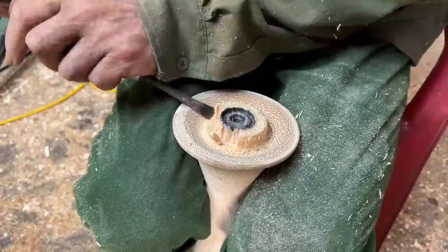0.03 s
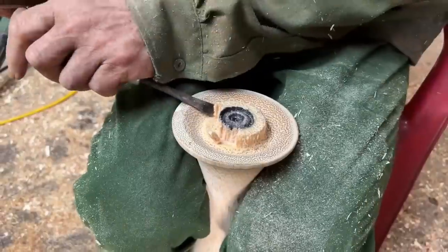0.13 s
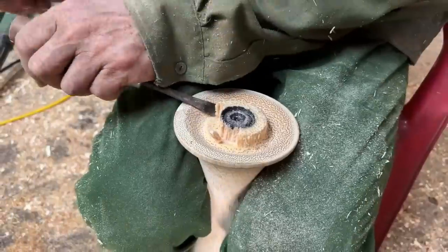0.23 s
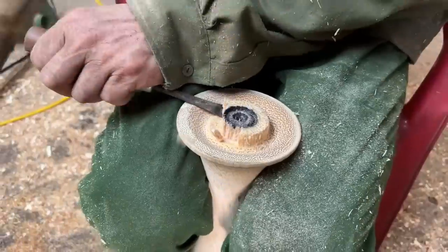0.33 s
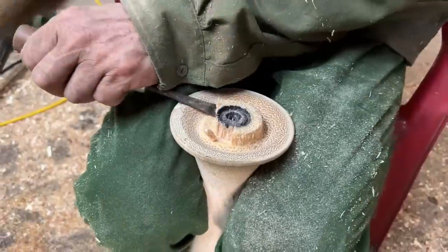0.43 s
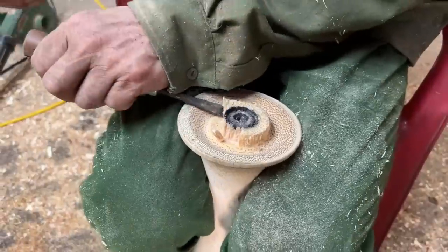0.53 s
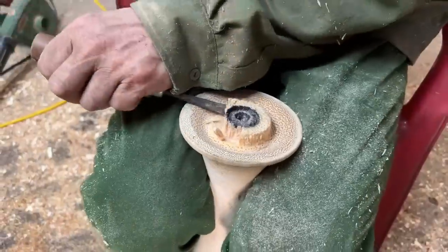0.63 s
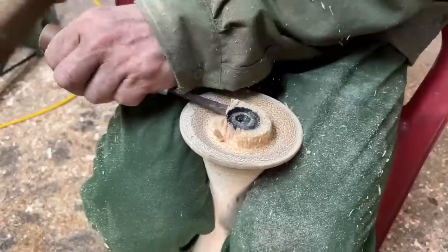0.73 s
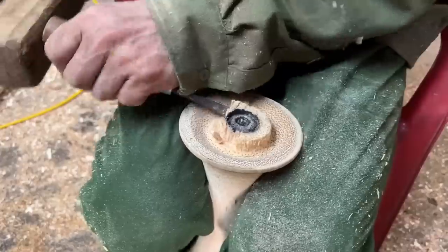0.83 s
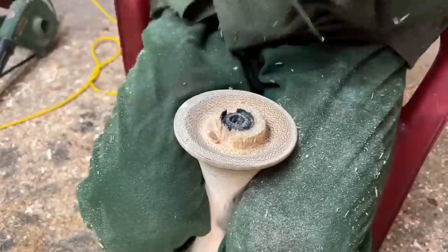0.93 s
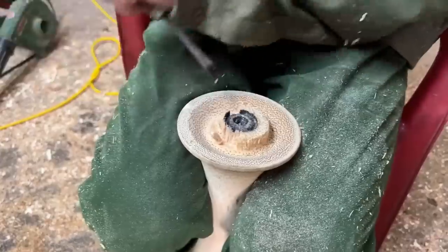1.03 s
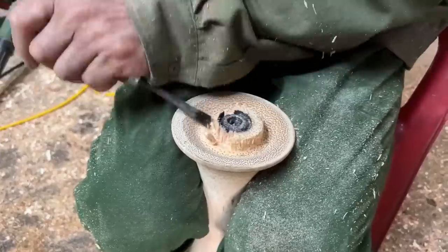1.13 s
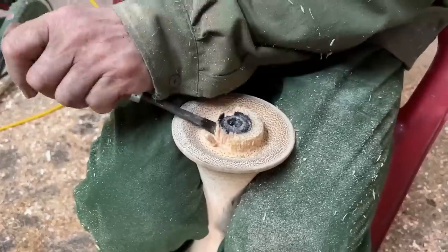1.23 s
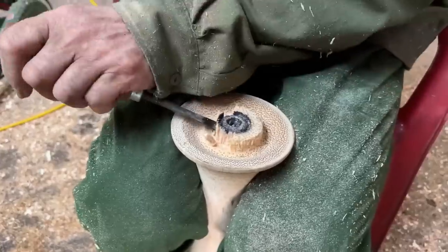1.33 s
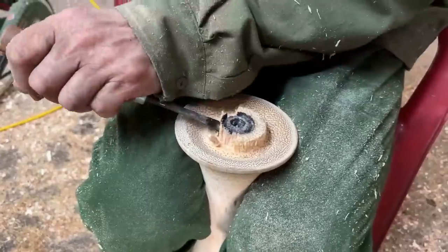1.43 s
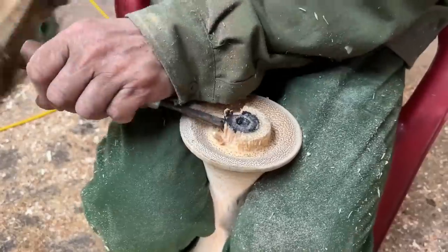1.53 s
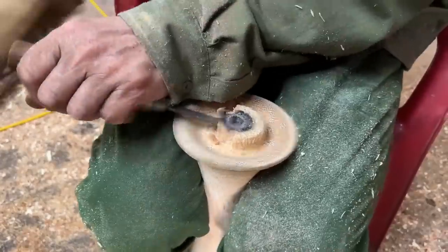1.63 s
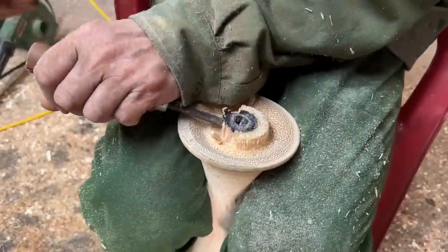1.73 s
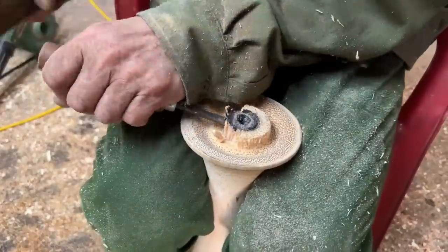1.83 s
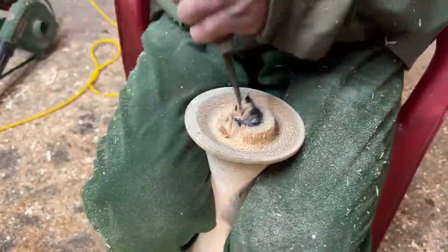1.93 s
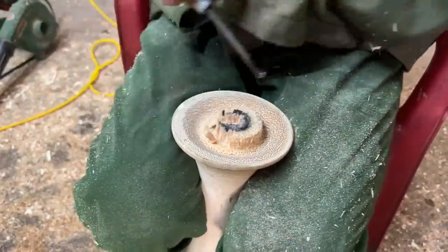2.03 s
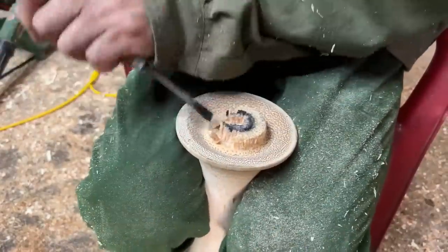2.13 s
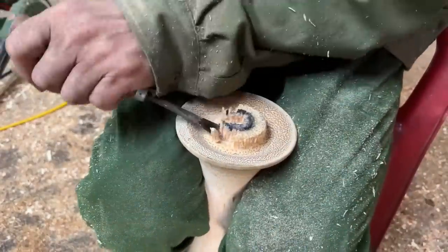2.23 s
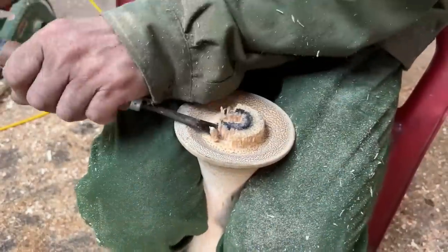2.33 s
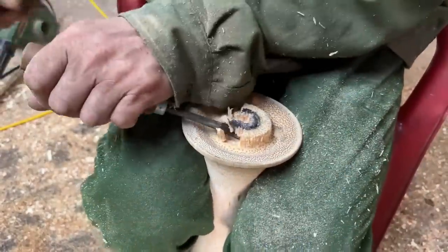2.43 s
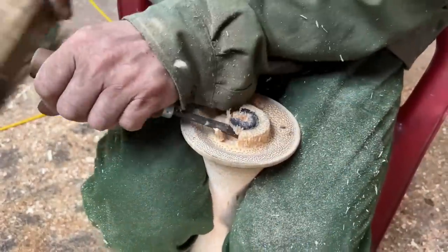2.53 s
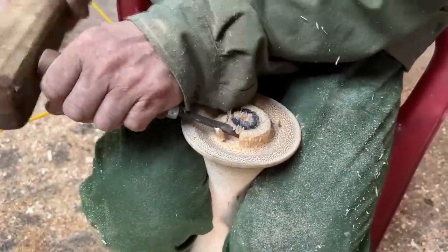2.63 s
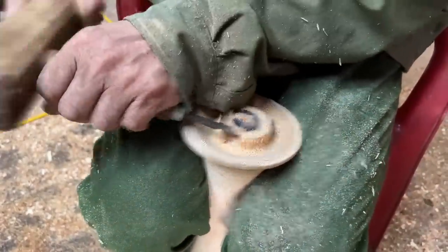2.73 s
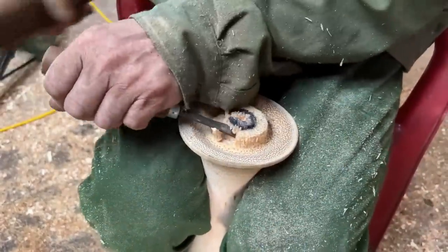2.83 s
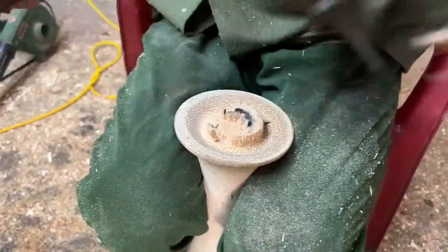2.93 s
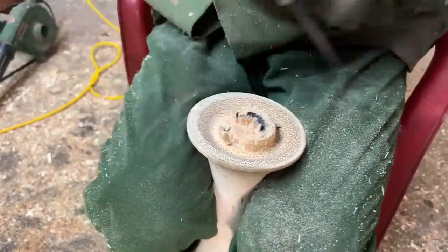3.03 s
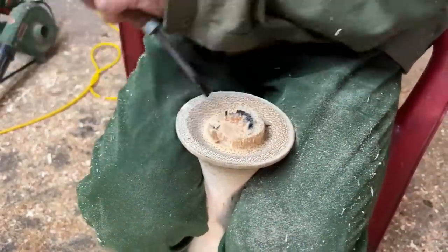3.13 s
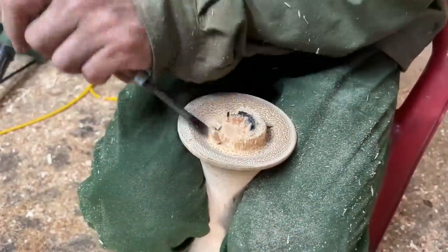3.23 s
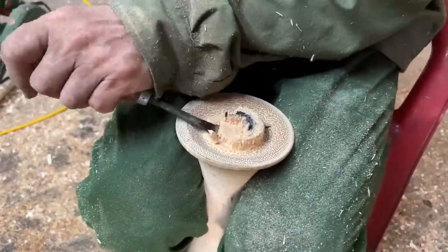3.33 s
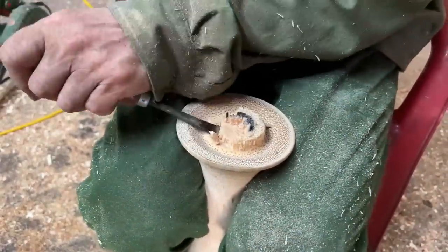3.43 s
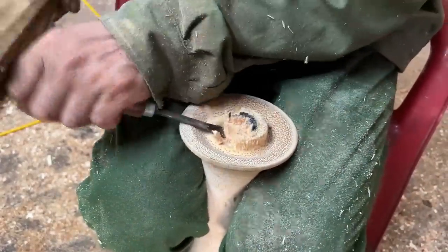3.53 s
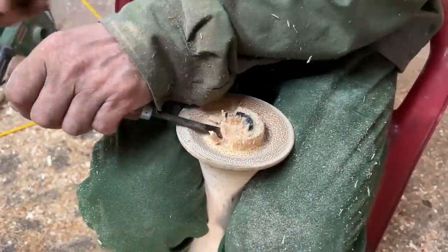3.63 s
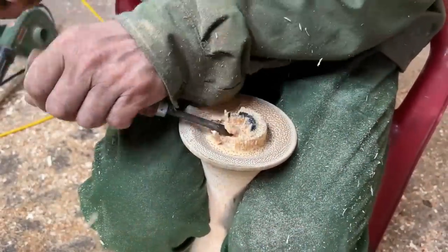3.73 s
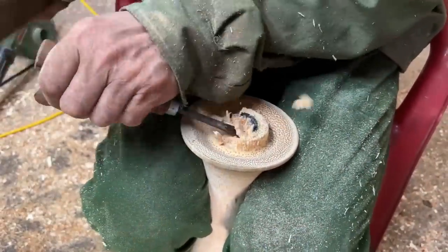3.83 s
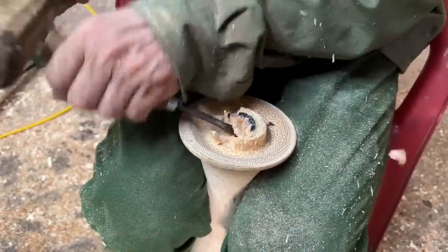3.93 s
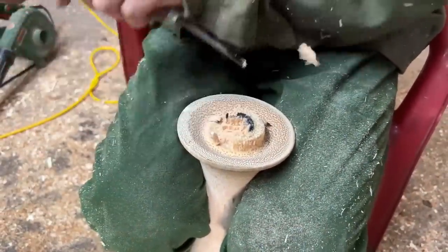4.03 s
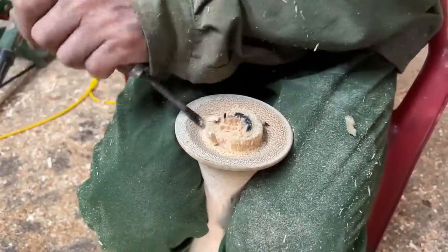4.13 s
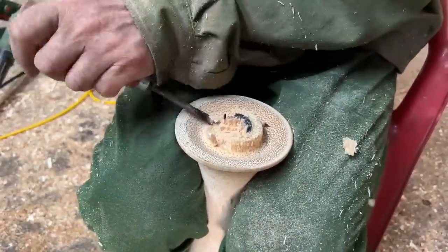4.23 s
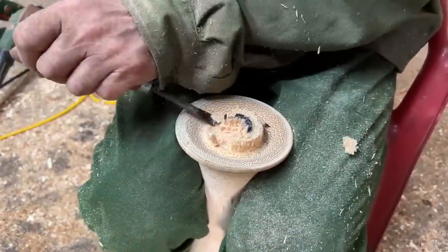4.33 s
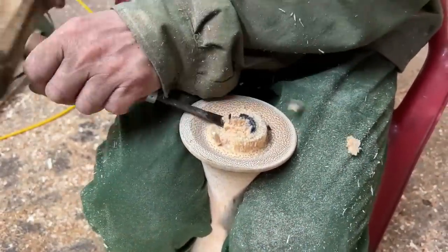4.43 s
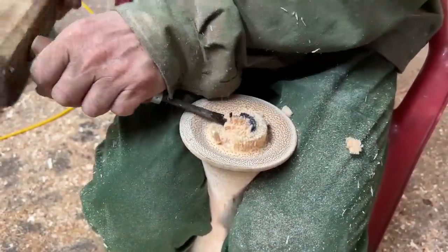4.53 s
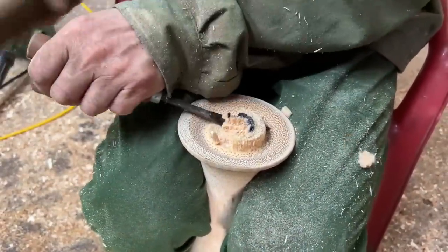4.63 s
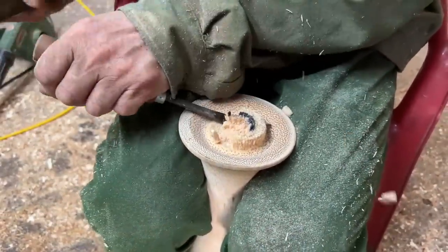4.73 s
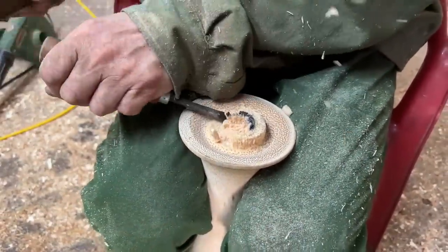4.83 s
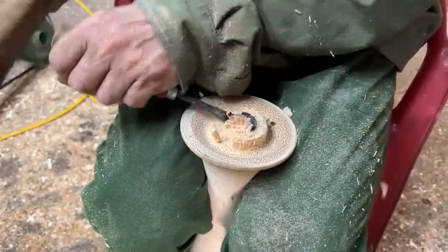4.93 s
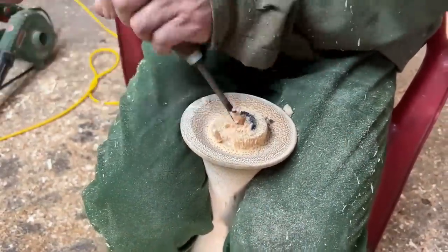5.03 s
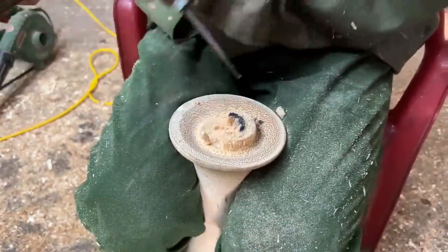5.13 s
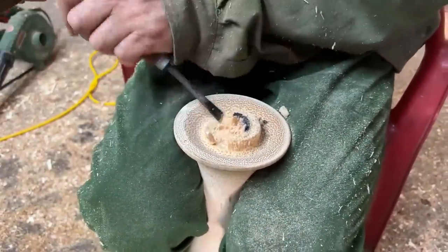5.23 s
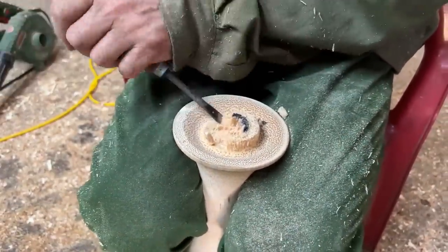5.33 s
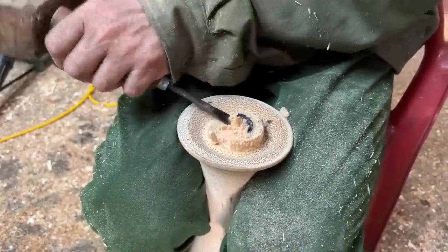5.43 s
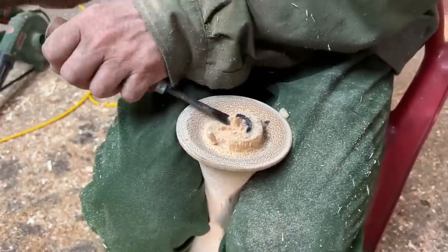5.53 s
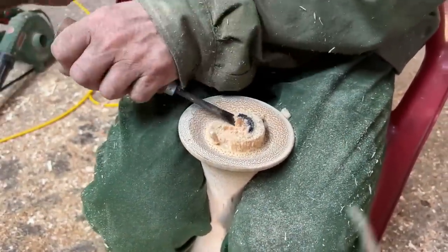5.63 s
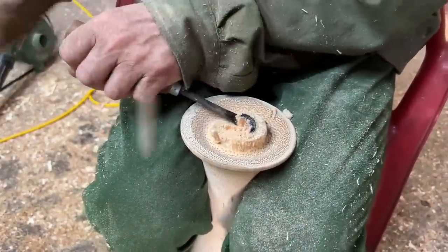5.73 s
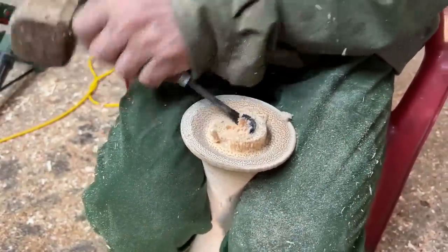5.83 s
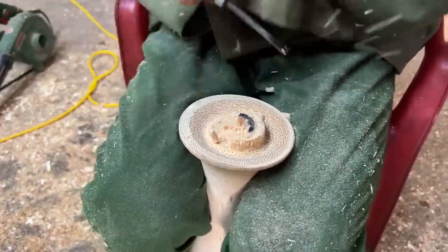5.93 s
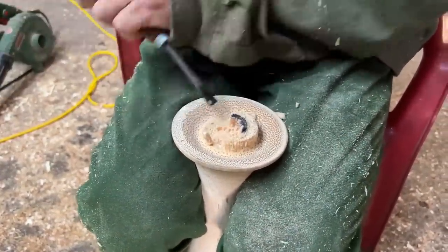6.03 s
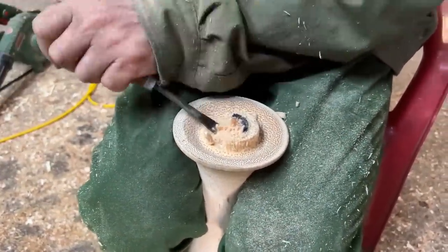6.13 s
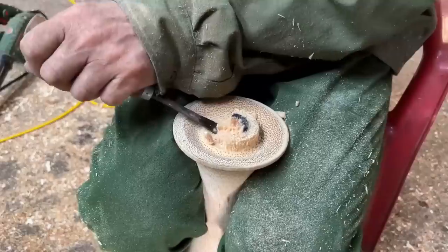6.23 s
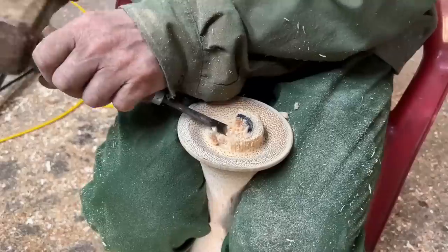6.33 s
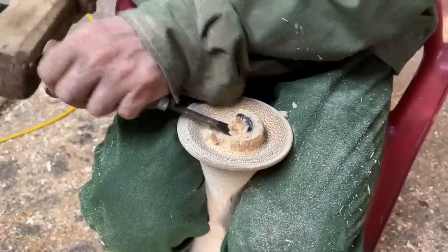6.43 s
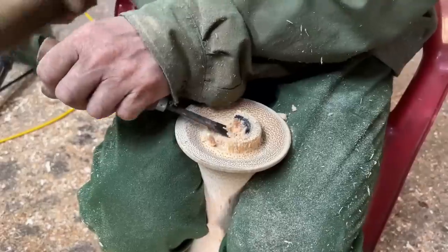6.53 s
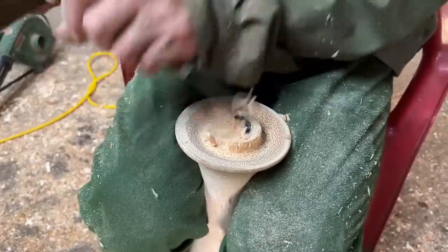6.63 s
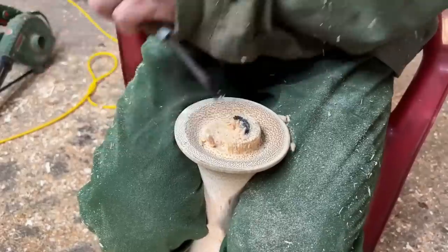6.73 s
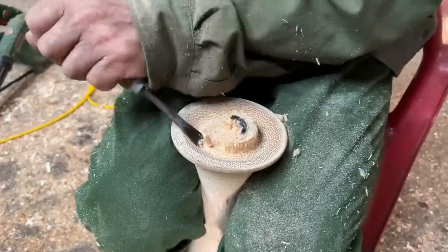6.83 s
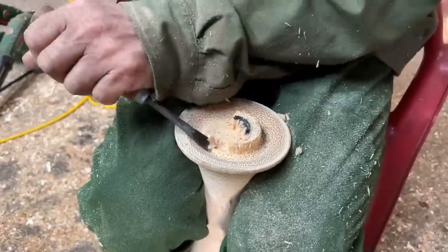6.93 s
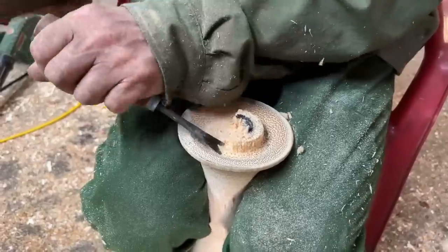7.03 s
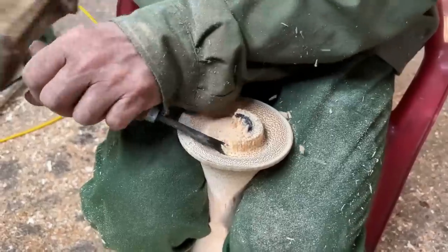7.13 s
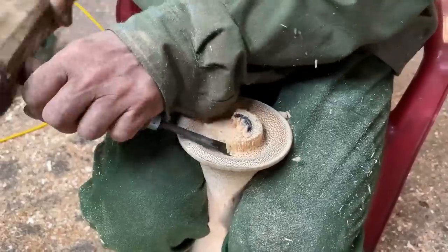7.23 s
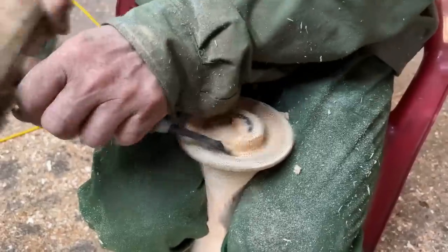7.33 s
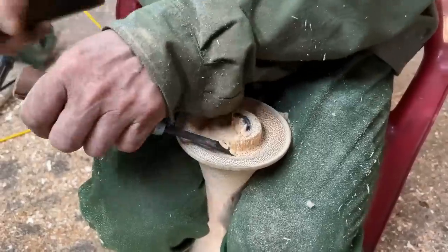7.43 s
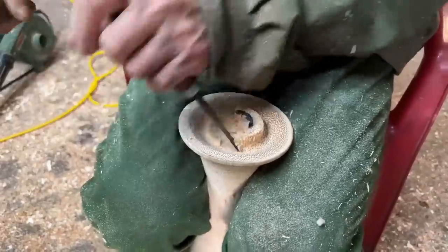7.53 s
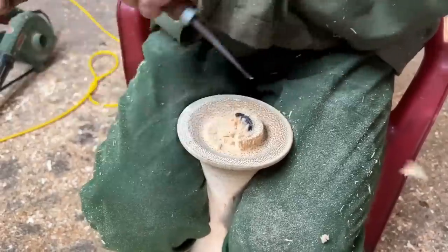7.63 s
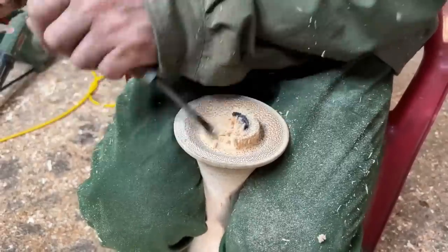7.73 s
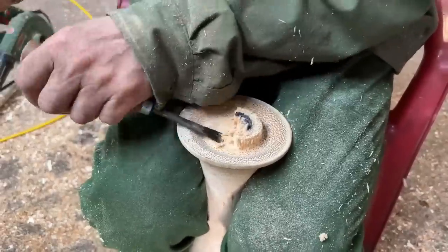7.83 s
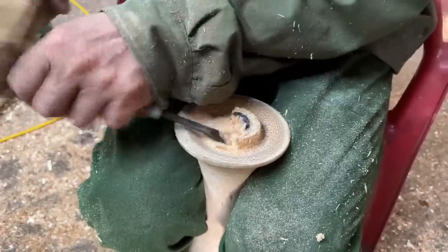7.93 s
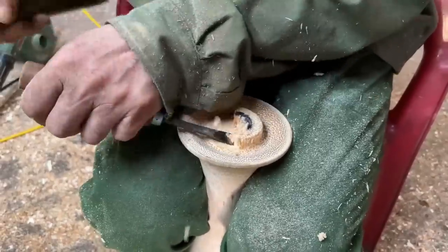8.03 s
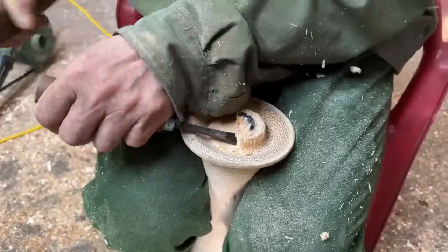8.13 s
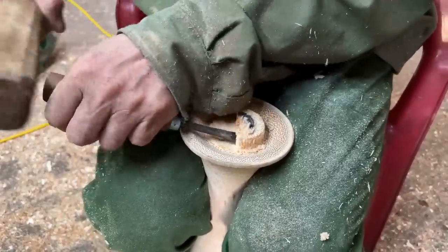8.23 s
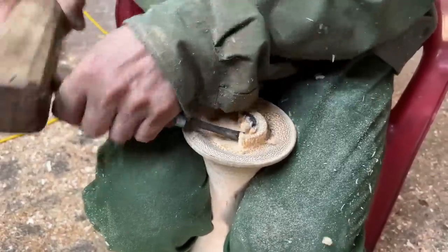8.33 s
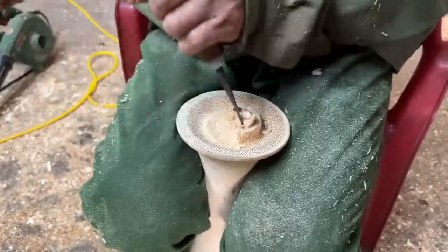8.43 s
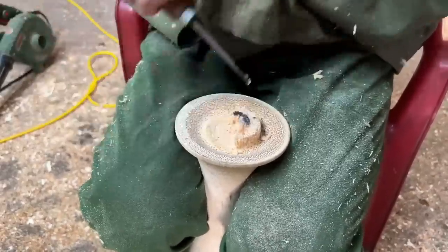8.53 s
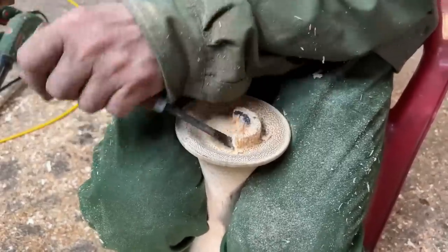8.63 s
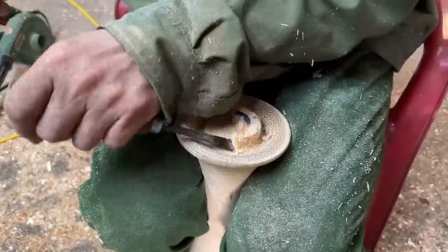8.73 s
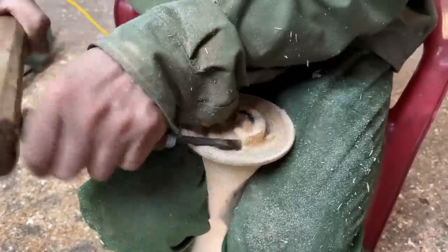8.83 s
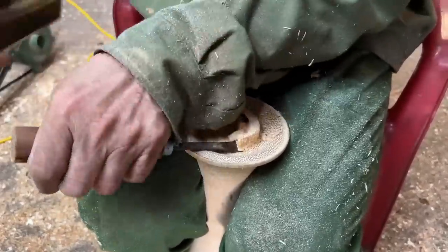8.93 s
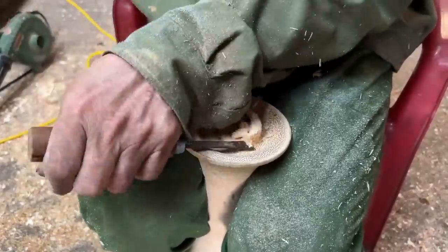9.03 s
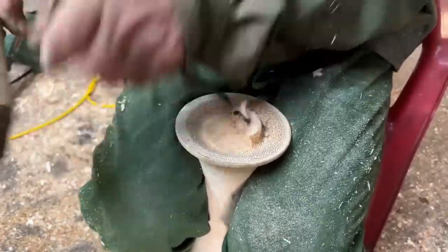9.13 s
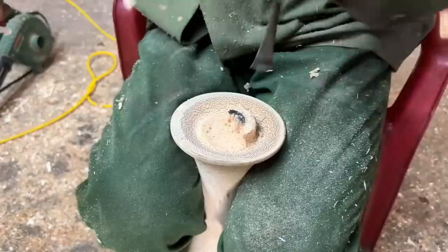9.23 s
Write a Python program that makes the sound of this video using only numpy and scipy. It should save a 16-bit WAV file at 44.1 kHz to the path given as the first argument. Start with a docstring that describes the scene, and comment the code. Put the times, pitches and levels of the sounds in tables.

```python
"""A wooden mallet drives a chisel into the foot of a turned vase held on the lap, in runs of three to five blows.
A blow is filtered noise of snapping fibres, damped modes of chisel and vase, and a thud into the legs.
Between runs, short resonant crackles are chips and blade touches; muffled bursts are the vase shifting on cloth.
A small workshop answers with decaying noise; shaped noise hums below, with a wavering drone at the start."""
import sys
import numpy as np
from scipy import signal
from scipy.fft import rfft, irfft
from scipy.io import wavfile
from scipy.ndimage import uniform_filter1d

SR = 44100
rng = np.random.default_rng(int(sys.argv[2]) if len(sys.argv) > 2 else 0)


def dump_mix(stems):
    """Bounce the given channels to the path in sys.argv[1] as a 16-bit WAV at rate SR."""
    frames = np.atleast_2d(stems).T  # one column per channel
    limited = np.clip(frames, -1, 1)  # hard clip at full scale
    pcm = np.round(limited * 32767).astype(np.int16)
    wavfile.write(sys.argv[1], SR, pcm)


N = 409248  # samples

# steady background spectrum, relative: freq_hz, density_db_per_hz
HUM_SPECTRUM = [(25, -5), (55, -6), (100, -.7), (170, -5.5), (220, -4), (290, 1.5), (380, -15), (550, -19),
                (1100, -17.5), (2800, -26), (4500, -33), (8000, -40), (11000, -51), (16000, -58)]
# swell of the background: time_s, gain_db
HUM_SWELL = [(.35, 7), (1.2, 1), (2.3, 2), (3.3, -1.5), (5.3, -.5), (7.4, 2), (9.28, .7)]
# light touches of the blade on the vase: start_s, level_db
TOUCHES = [(.132, -43), (6.917, -49)]
# chips flicked loose, mostly as the blade pulls out after a run:
# start_s, level_db, pitch_hz, decay_s, left_re_right_db
CHIPS = [(.198, -63, 3800, .003, 1), (1.005, -57, 3000, .007, 0), (2.049, -45, 2800, .008, 3),
         (2.276, -63, 4000, .005, 3), (3.025, -52, 3000, .007, 1), (4.065, -57, 3000, .006, -2),
         (5.131, -52, 5000, .014, 6), (5.146, -52, 4500, .005, 5), (5.164, -55, 3500, .005, 1),
         (6.017, -50, 3000, .009, 2), (6.745, -49, 3000, .008, -1), (7.702, -44, 2800, .004, -6),
         (7.938, -68, 4500, .004, 0), (8.527, -52, 2700, .005, 0), (8.562, -49, 2600, .005, -1)]
# dull bumps of the vase and arm on the lap: start_s, level_db, upper_edge_hz, decay_s
BUMPS = [(.355, -25, 1300, .009), (2.052, -42, 480, .02), (3.595, -37.5, 120, .02), (5.20, -43.5, 130, .03),
         (6.035, -48, 120, .015), (8.565, -46, 380, .02)]
# mallet blows, levels before trims:
# start_s, crack_db, thud_db, give_s (time the wood gives), ring_re_crack_db, left_re_right_db
BLOWS = [(.4003, -21, -36, .013, -4, -6), (.5482, -19, -43, .0044, -8, -3),
         (.6766, -21, -35, .0071, -7, -4), (.8017, -19, -35, .0041, -6, 3),
         (.9208, -23, -35, .003, -10, -2), (1.6127, -23, -38, .0015, -4, 0),
         (1.7454, -18, -39, .0029, -14, 1), (1.8741, -20, -42, .0034, -10, -2),
         (2.4781, -22, -52, .0014, -11, 5), (2.6097, -21, -40, .0062, -8, -2),
         (2.7321, -22, -40, .0017, -10, 1), (2.8468, -24, -39, .0048, -14, -2),
         (2.9579, -25, -37, .0059, -11, 1), (3.6431, -17, -44, .0028, -9, 1),
         (3.7673, -22, -48, .0056, -9, -5), (3.8921, -23, -44, .0081, -7, 3),
         (4.0098, -19.5, -49, .0027, -4.5, 1), (4.5104, -23, -41, .0022, -11, -2),
         (4.6325, -19.5, -40, .0066, -13, -8), (4.7557, -23, -39, .0052, -12, -6),
         (4.8695, -18, -41, .004, -14, -9), (4.9892, -24, -41, .0029, -13, 5),
         (5.5367, -23, -41, .0053, -10, 0), (5.6655, -17, -43, .0028, -11, -1),
         (5.7925, -20, -36, .0023, -11, 7), (5.9103, -22, -35, .0063, -8, -3),
         (6.4128, -18, -46, .0037, -7, 2), (6.537, -20, -45, .0065, -2, 4),
         (6.6572, -19, -42, .0094, -7, -6), (7.0869, -18, -48, .0038, -5, 1),
         (7.2159, -21, -46, .0075, -2, -3), (7.3349, -23, -48, .0018, -7, 3),
         (7.4504, -19, -38, .0077, -9, -1), (7.5701, -20, -34, .0042, -14, 5),
         (8.0503, -17, -47, .0067, -6, 0), (8.1811, -21, -44, .0018, -5, 2),
         (8.3127, -22, -44, .0104, -5.5, -6), (8.4295, -24, -39, .0017, -10, 3),
         (8.9402, -20, -45, .0054, -6, 4), (9.0652, -21, -39, .0061, -10, -2),
         (9.1851, -20, -37, .0037, -9, 6)]
# runs of blows, one cut each, the blade set in a new place in the grain; base values:
# start_s, knock_db, splinter_re_crack_db, splinter_tilt_db_per_octave, room_db
CUTS = [(.3, -30.7, -9.2, 2.8, -28.3), (1.5, -32.7, -11, -.3, -30), (2.4, -34, -12, 0, -30),
        (3.5, -33.3, -8.5, -1.8, -32.8), (4.4, -31.8, -10, .2, -31.8), (5.4, -31.5, -12, 3, -31.6),
        (6.3, -34.3, -12.2, -.7, -29.3), (6.95, -33.5, -11.8, .5, -31.6), (7.95, -33.3, -10, -3.5, -30.8),
        (8.8, -32.5, -8.6, -5, -31)]
# colour of the struck wood, relative: freq_hz, density_db_per_hz
WOOD_COLOUR = [(40, -16), (260, -12.5), (450, -16.5), (620, -12.5), (800, -8), (960, -11.5), (1300, -5.5),
               (1800, -1), (3250, -6.7), (3800, -4), (4600, -15.5), (6300, -13.5), (12000, -26),
               (16000, -24)]
# modes of chisel and vase: ratio_to_ring_pitch, level_db, t60_s
TOOL_MODES = [(.455, -17, .07), (.76, -10, .07), (.962, -4, .08), (1.0, 0, .115), (1.04, -4.5, .08),
              (1.17, -10, .06), (1.55, -15, .04), (2.09, -15, .06), (2.22, -14, .06)]
# workshop decay: freq_hz, t60_s
ROOM_T60 = [(100, .3), (400, .36), (1000, .33), (1800, .31), (3800, .27), (7000, .27), (15000, .21)]
# workshop colour: freq_hz, gain_db
ROOM_COLOUR = [(60, -9), (250, -4), (500, 1.5), (1200, 2.5), (1800, 1.2), (2600, -1), (3700, -1.5),
               (4500, -3), (6000, -1.3), (10000, -3), (15000, -5.5)]

# registers of a blow: lower_edge_hz, upper_edge_hz, decay_factor, offset_s, trim_db
THUD = (35, 355, 1.1, .001, 0)
KNOCK = (400, 1450, 1.35, -.0008, .7)
CRACK = (1450, 4500, .62, -.0005, -.6)
SPLINTER = (4200, 16000, .8, -.0002, .5)

HUM_DB = -57.6  # before the swell
# drone holds, then dies away
DRONE_HZ, DRONE_DB, DRONE_HOLD_S, DRONE_FALL_DB_PER_S = 62, -47.5, .17, 90
FIZZ_RE_CHIP_DB = -3

# ordinary blow
USUAL_CRACK_DB, USUAL_THUD_DB, USUAL_GIVE_S = -20.5, -40.7, .004
# the knock of the vase follows crack and thud (dB per dB) and grows as the edge sinks in
KNOCK_DB_PER_CRACK_DB, KNOCK_DB_PER_THUD_DB, KNOCK_DB_PER_BLOW = .68, .42, .5
# ring pitch shifts as the grip changes
RING_HZ, RING_SCATTER_HZ = 1770, 50
# a heavier thud tears finer splinters: dB per octave for each dB of thud; chance, dB per octave
TILT_PER_THUD_DB, TILT_SCATTER_DB_PER_OCTAVE = .15, .8
# resonance of the chip loosened by a blow
CHIP_HZ, CHIP_SCATTER_OCTAVES = 2900, .3
# the room answers more evenly than the crack (dB per dB), more to a long tear, less to a buried edge
ROOM_DB_PER_CRACK_DB, ROOM_DB_PER_GIVE_DOUBLING, ROOM_DB_PER_BLOW = .45, .6, -.35
# the two channels start slightly apart, usually the louder one first: s per dB, and chance in s
LAG_S_PER_DB, LAG_SCATTER_S = .00016, .0009

EDGE_HZ = 16150  # upper band limit

# frame of one short sound; T is zero at the snap
SIZE = 8192
LEAD_S = 512 / SR
T, HZ = np.arange(SIZE) / SR - LEAD_S, np.fft.rfftfreq(SIZE, 1 / SR)


def amp(db):
    """Decibels to gain."""
    return 10 ** (np.asarray(db) / 20)


def read(points, hz):
    """Interpolates a (freq_hz, value) table on a log-frequency axis."""
    table_hz, value = np.transpose(points)
    return np.interp(np.log(hz + 1), np.log(table_hz + 1), value)


def background(shared=.12, waver=.06, wander_db=.8):
    """Low hum and faint hiss as partly shared stereo noise, plus a wavering sine drone that dies away."""
    t = np.arange(N) / SR
    gain = amp(read(HUM_SPECTRUM, np.fft.rfftfreq(N, 1 / SR)))
    noise = irfft(rfft(rng.standard_normal((3, N))) * gain, N)
    noise /= noise.std()
    stereo = np.sqrt(shared) * noise[0] + np.sqrt(1 - shared) * noise[1:]
    hum = stereo * amp(HUM_DB + np.interp(t, *np.transpose(HUM_SWELL)))

    wander = uniform_filter1d(uniform_filter1d(rng.standard_normal(N), size=4000), size=2500)
    hum *= amp(wander_db * wander / wander.std())

    drift = uniform_filter1d(rng.standard_normal(N), size=2000)
    turns = np.cumsum(DRONE_HZ * (1 + waver * drift / drift.std())) / SR
    drone_db = DRONE_DB - DRONE_FALL_DB_PER_S * np.maximum(t - DRONE_HOLD_S, 0)
    drone = amp(drone_db) * np.sqrt(2) * np.sin(2 * np.pi * turns)
    return hum + drone


def add(mix, start_s, sound):
    """Mixes a stereo sound in at start_s, cut at the end of the mix."""
    part = mix[:, max(round(start_s * SR), 0):][:, :sound.shape[1]]
    part += sound[:, :part.shape[1]]


def sized(x, level_db):
    """Scales each channel to the energy of 10 ms of sound at level_db."""
    energy = np.sum(x ** 2, -1, keepdims=True)
    return x * amp(level_db) * np.sqrt(SR / 100 / (energy + 1e-20))


def band(hz, low_hz, high_hz):
    """Gain of a steep band-pass."""
    return 1 / np.sqrt((1 + (low_hz / (hz + 1)) ** 12) * (1 + (hz / high_hz) ** 12))


def coloured(x, gain):
    """Minimum-phase filter with the given gain per frequency bin, floored 80 dB below its peak."""
    log_gain = np.log(np.maximum(gain, gain.max() * 1e-4))
    circle = np.concatenate([log_gain, log_gain[-2:0:-1]])
    response = np.exp(np.conj(signal.hilbert(circle)))[:len(gain)]
    return irfft(rfft(x) * response)


def placed(x, left_re_right_db, lag_s=0):
    """Tips a stereo sound to one side; positive lag_s delays the right channel, negative the left."""
    gains = amp([left_re_right_db / 2, -left_re_right_db / 2])
    gains /= np.sqrt(np.mean(gains ** 2))
    delays_s = np.maximum([-lag_s, lag_s], 0)
    late = np.array([np.pad(c, (round(d * SR), 0))[:len(c)] for c, d in zip(x, delays_s)])
    return late * gains[:, None]


def fibres(decay_s, press_db=-12.5, press_s=.0042, snap=2.6, grain_db=4.0, shared=.4,
           after_db=-17, after_s=.012):
    """Fibres crush as the edge presses in, one snaps, the rest break in a dying burst, a few tear late."""
    noise = rng.standard_normal((3, SIZE))
    noise = noise * amp(grain_db * np.clip(rng.standard_normal((3, SIZE)), -2, 2))
    noise /= noise.std()
    burst = np.sqrt(shared) * noise[0] + np.sqrt(1 - shared) * noise[1:]
    pressing = amp(press_db) * np.exp(-abs(T) / press_s)
    breaking = np.exp(-abs(T) / decay_s) + amp(after_db) * np.exp(-abs(T) / after_s)
    impulse = snap * (np.arange(SIZE) == round(LEAD_S * SR))
    return burst * np.where(T < 0, pressing, breaking) + impulse


def workshop(x, build_s=.012, patchy_db=3.0):
    """Dense reflections from walls and benches, in clumps, each band dying at its own speed."""
    taps = rng.standard_normal((2, SR // 2))
    hz, t, spectrum = signal.stft(taps, SR, nperseg=256)

    fade = amp(-60 * t / read(ROOM_T60, hz)[:, None]) * (1 - np.exp(-(t / build_s) ** 2))
    fade /= np.sqrt(np.sum(fade ** 2, 1).max() * t[1] * SR)  # unit energy in the longest band

    patches = uniform_filter1d(rng.standard_normal(spectrum.shape), size=8, axis=1)
    patches = uniform_filter1d(patches, size=3, axis=2)
    clumps = amp(patchy_db * patches / patches.std())
    clumps /= np.sqrt(np.mean(clumps ** 2))

    colour = amp(read(ROOM_COLOUR, hz))[:, None]
    tail = signal.istft(spectrum * fade * clumps * colour, SR, nperseg=256)[1]
    return signal.fftconvolve(x, tail, axes=1)


def crackle(pitch_hz, level_db, decay_s, sharpness=2.6):
    """Small dry crackle: a fibre burst through one broad resonance."""
    detuning = sharpness * (HZ / pitch_hz - pitch_hz / (HZ + 1))
    resonance = band(HZ, 500, 1.5 * pitch_hz) / (1 + detuning ** 2)
    return sized(coloured(fibres(decay_s), resonance), level_db)


def touches(pitch_hz=1850, decay_s=.002, left_re_right_db=-3, room_db=-12):
    """The blade is set against the vase with a dull, broadly resonant tick."""
    out = np.zeros((2, N))
    for start_s, level_db in TOUCHES:
        tick = crackle(pitch_hz, level_db, decay_s, sharpness=1.6)
        add(out, start_s - LEAD_S, placed(tick, left_re_right_db))
        add(out, start_s - LEAD_S, amp(room_db) * workshop(tick))
    return out


def chips(room_db=-12):
    """Each chip is a small crackle with one broad resonance and some fizz above it."""
    out = np.zeros((2, N))
    fizz_colour = band(HZ, 4500, 16000) * amp(read(WOOD_COLOUR, HZ))
    for start_s, level_db, pitch_hz, decay_s, left_re_right_db in CHIPS:
        tick = crackle(pitch_hz, level_db, decay_s)
        fizz = sized(coloured(fibres(decay_s), fizz_colour), level_db + FIZZ_RE_CHIP_DB)
        chip = tick + fizz
        add(out, start_s - LEAD_S, placed(chip, left_re_right_db))
        add(out, start_s - LEAD_S, amp(room_db) * workshop(chip))
    return out


def bumps(room_db=-11):
    """Soft knocks, low-passed by cloth and legs."""
    out = np.zeros((2, N))
    for start_s, level_db, edge_hz, decay_s in BUMPS:
        muffle = band(HZ, 45, 6000) / (1 + (HZ / edge_hz) ** 3)
        bump = sized(coloured(fibres(decay_s), muffle), level_db)
        add(out, start_s - LEAD_S, bump)
        add(out, start_s - LEAD_S, amp(room_db) * workshop(bump))
    return out


def cut_of(start_s):
    """The cut a blow belongs to, and how many blows of that cut came before it."""
    cut = [row for row in CUTS if row[0] <= start_s][-1]
    return cut, sum(cut[0] <= blow[0] < start_s for blow in BLOWS)


def blow_colour(chip_hz, tilt_db_per_octave, chip_db=2.8, width_octaves=.17, pivot_hz=6000):
    """Wood colour, resonance of the loosening chip, and a treble tilt for finer or coarser splinters."""
    octave = np.log2(HZ + 1)
    resonance_db = chip_db * np.exp(-((octave - np.log2(chip_hz)) / width_octaves) ** 2)
    tilt_db = tilt_db_per_octave * np.maximum(octave - np.log2(pivot_hz), 0)
    return amp(read(WOOD_COLOUR, HZ) + resonance_db + tilt_db)


def wood_part(part, level_db, give_s, colour):
    """One register of the wood, shaken by the breaking fibres."""
    low_hz, high_hz, decay_factor, offset_s, trim_db = part
    sound = coloured(fibres(give_s * decay_factor), colour * band(HZ, low_hz, high_hz))
    return sized(np.roll(sound, round(offset_s * SR), 1), level_db + trim_db)


def tool_ring(ring_hz, scatter_db=3.0, detune=.015):
    """Damped modes of the gripped chisel and the vase; every blow weights them anew."""
    after_s, ring = np.maximum(T, 0), np.zeros((2, SIZE))
    for ratio, level_db, t60_s in TOOL_MODES:
        weight, shift = rng.standard_normal(2)
        mode_hz = ring_hz * ratio * (1 + detune * shift * (ratio != 1))  # main mode stays in tune
        turns = mode_hz * after_s + rng.random((2, 1))
        envelope = amp(level_db + scatter_db * weight - 60 * after_s / t60_s)
        ring += envelope * np.sin(2 * np.pi * turns)
    return ring * (1 - np.exp(-after_s / .0006))


def near_echoes(x, spread_s=.018, count=6):
    """Single early echoes from the floor, the body and the bench."""
    taps = np.zeros((2, SIZE))
    for channel in taps:
        delay_s = .003 + spread_s * rng.random(count) ** 1.5
        channel[np.round(delay_s * SR).astype(int)] = rng.choice([-1, 1], count) / np.sqrt(count)
    return signal.fftconvolve(x, taps, axes=1)[:, :SIZE]


def blows(ring_room_db=-4.8, ring_trim_db=-.8, room_trim_db=2.9, splinter_room_db=-1.3, echo_db=-13, hit_db=.5):
    """Mallet on chisel: thud, knock, crack and splinters of the wood, the tool's ring, echoes and room."""
    out = np.zeros((2, N))
    chances = np.clip(rng.standard_normal((len(BLOWS), 4)), -2, 2)
    for blow, (chip, grain, grip, side) in zip(BLOWS, chances):
        start_s, crack_db, thud_db, give_s, ring_re_crack_db, left_re_right_db = blow
        (_, knock_db, splinter_re_crack_db, tilt, room_db), depth = cut_of(start_s)
        harder_db, heavier_db = crack_db - USUAL_CRACK_DB, thud_db - USUAL_THUD_DB

        knock_db += KNOCK_DB_PER_CRACK_DB * harder_db + KNOCK_DB_PER_THUD_DB * heavier_db
        knock_db += KNOCK_DB_PER_BLOW * depth
        tilt += TILT_PER_THUD_DB * heavier_db + TILT_SCATTER_DB_PER_OCTAVE * grain
        room_db += ROOM_DB_PER_BLOW * depth + ROOM_DB_PER_CRACK_DB * harder_db
        room_db += ROOM_DB_PER_GIVE_DOUBLING * np.log2(give_s / USUAL_GIVE_S)

        colour = blow_colour(CHIP_HZ * 2 ** (CHIP_SCATTER_OCTAVES * chip), tilt)
        body = wood_part(THUD, thud_db, give_s, colour)
        body = body + wood_part(KNOCK, knock_db, give_s, colour)
        body = body + wood_part(CRACK, crack_db, give_s, colour)
        splinters = wood_part(SPLINTER, crack_db + splinter_re_crack_db, give_s, colour)
        hit = body + splinters
        ring_db = crack_db + ring_re_crack_db + ring_trim_db
        ringing = sized(tool_ring(RING_HZ + RING_SCATTER_HZ * grip), ring_db)

        lag_s = LAG_S_PER_DB * left_re_right_db + LAG_SCATTER_S * side
        direct = placed(hit, left_re_right_db, lag_s)
        near = amp(hit_db) * direct + ringing + amp(echo_db) * near_echoes(hit)
        add(out, start_s - LEAD_S, near)

        # the chisel radiates to all sides; the splinters fill the room less than the crack does
        wood_to_room = amp(room_db - crack_db + room_trim_db) * (body + amp(splinter_room_db) * splinters)
        add(out, start_s - LEAD_S, workshop(wood_to_room + amp(ring_room_db) * ringing))
    return out


def scene():
    """Sum of all sources, in stereo."""
    return background() + touches() + chips() + bumps() + blows()


def record(dry):
    """Rounds the highest peaks with tanh, then low-passes at EDGE_HZ."""
    rounded = .9 * np.tanh(dry / .9)
    lowpass = signal.firwin(511, EDGE_HZ, window=("kaiser", 9), fs=SR)
    return signal.oaconvolve(rounded, lowpass[None], "same")


dry = scene()
out = record(dry)
dump_mix(out)
```